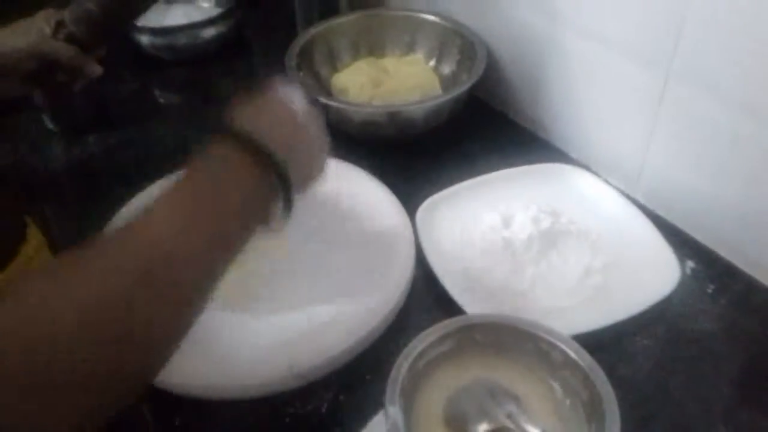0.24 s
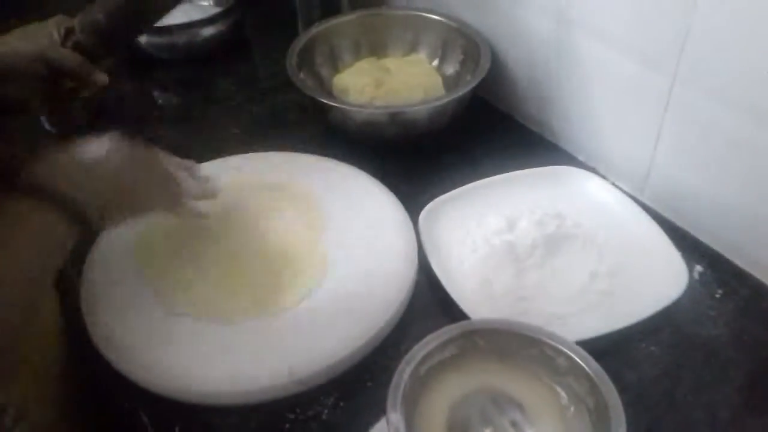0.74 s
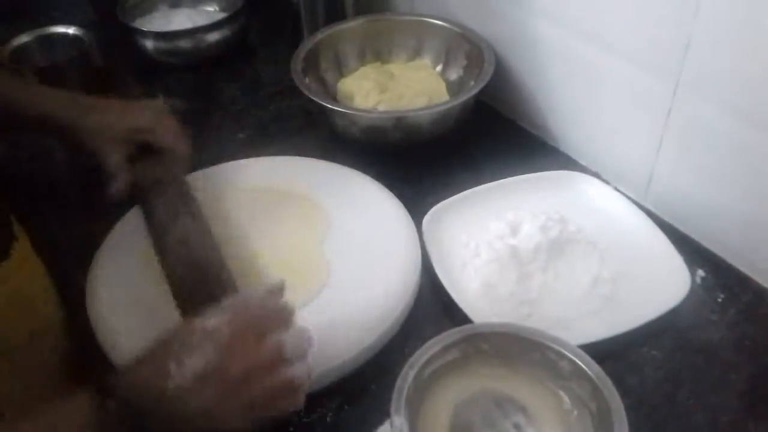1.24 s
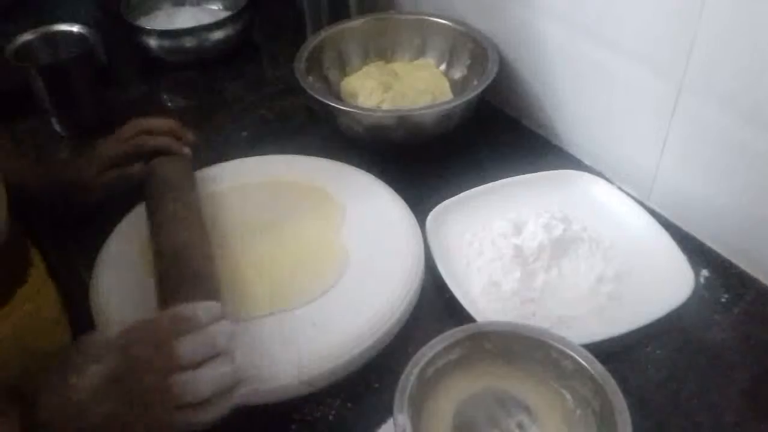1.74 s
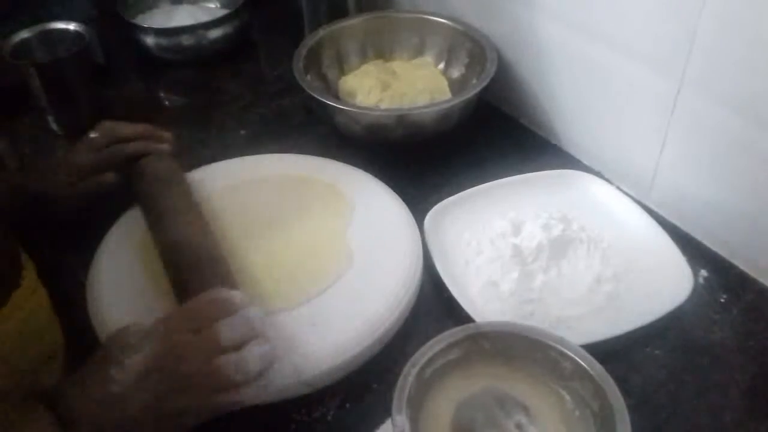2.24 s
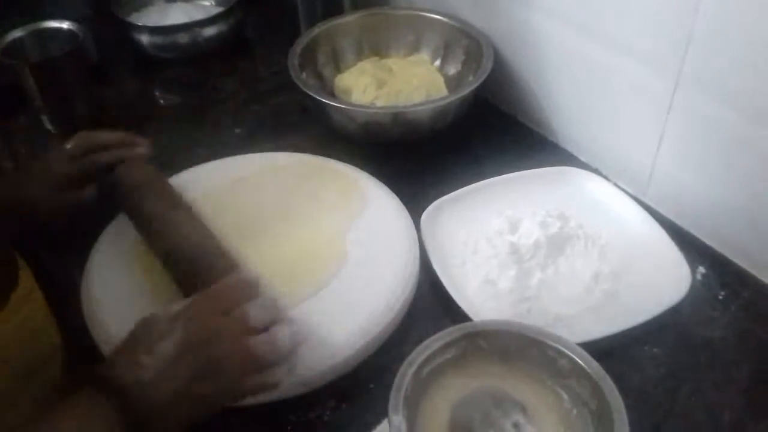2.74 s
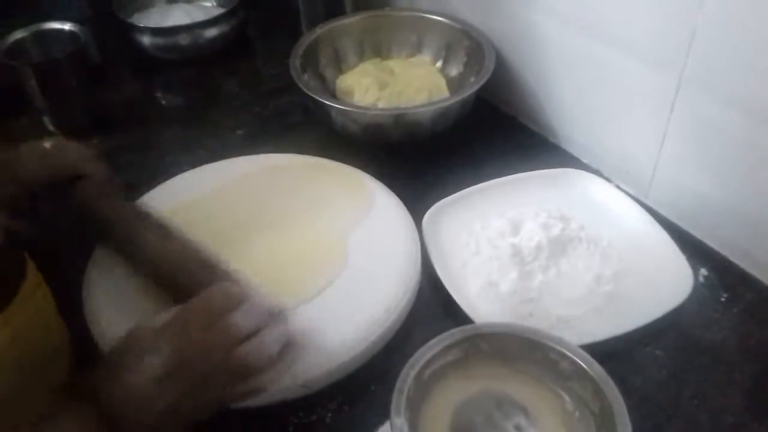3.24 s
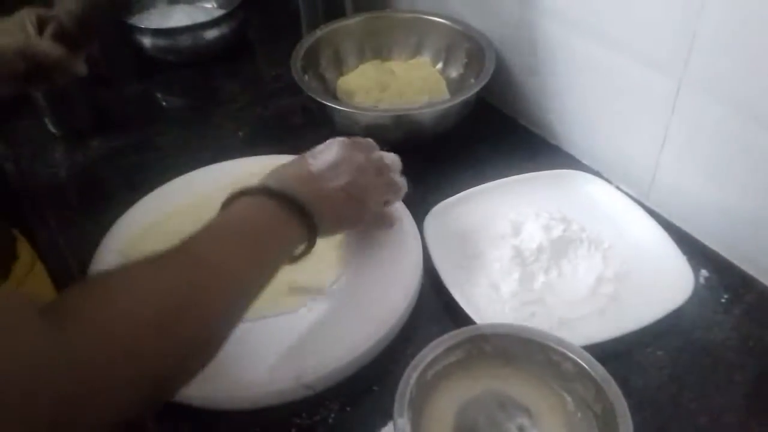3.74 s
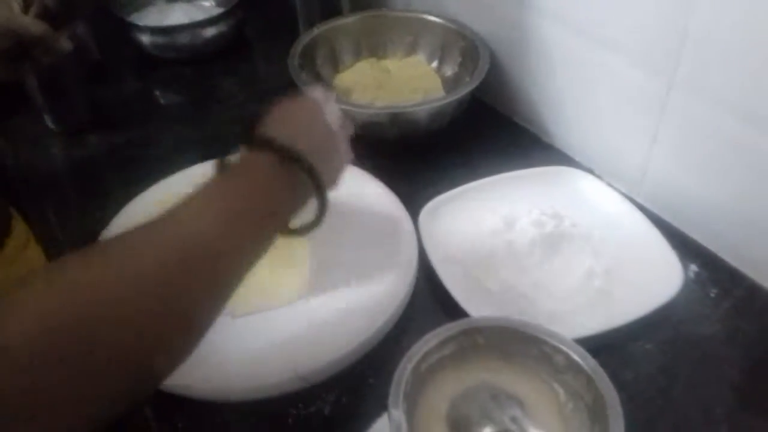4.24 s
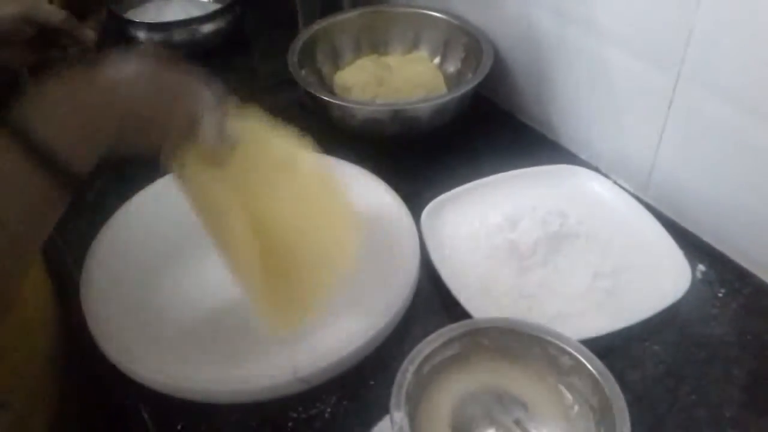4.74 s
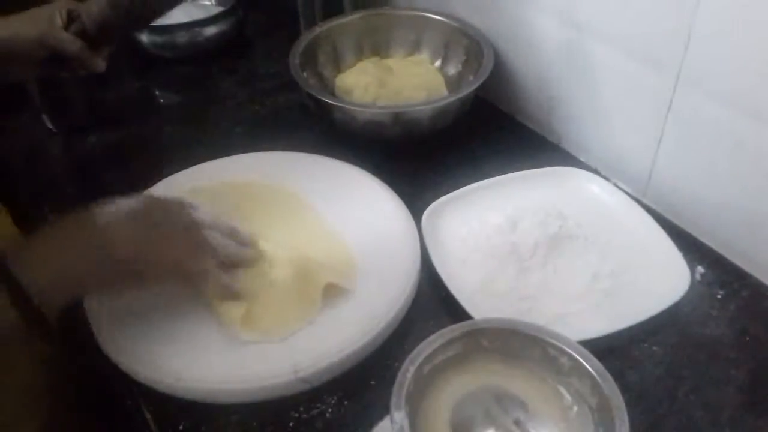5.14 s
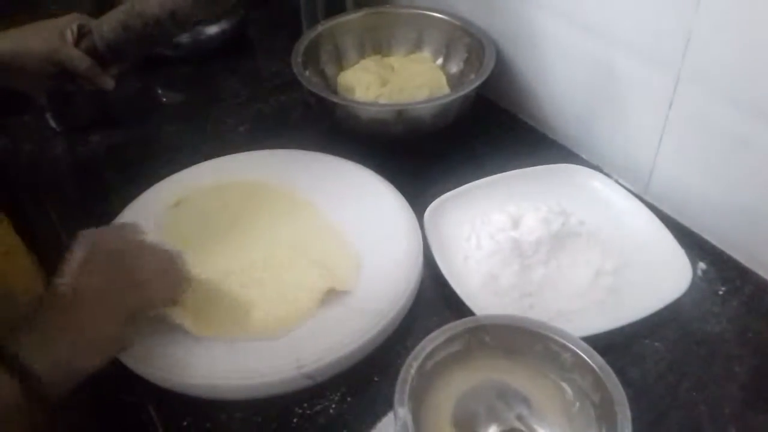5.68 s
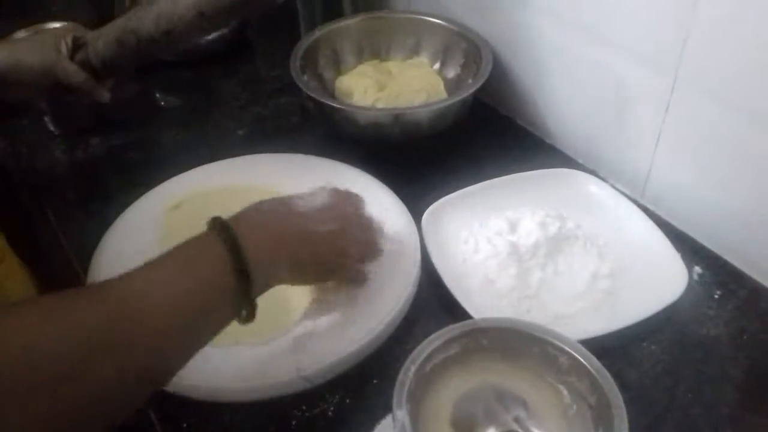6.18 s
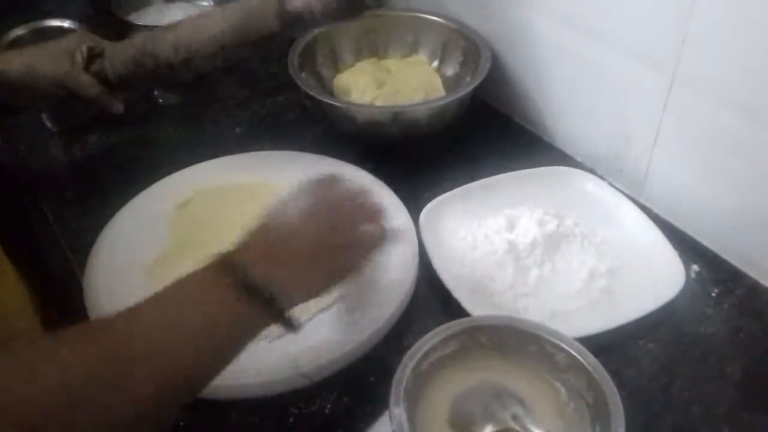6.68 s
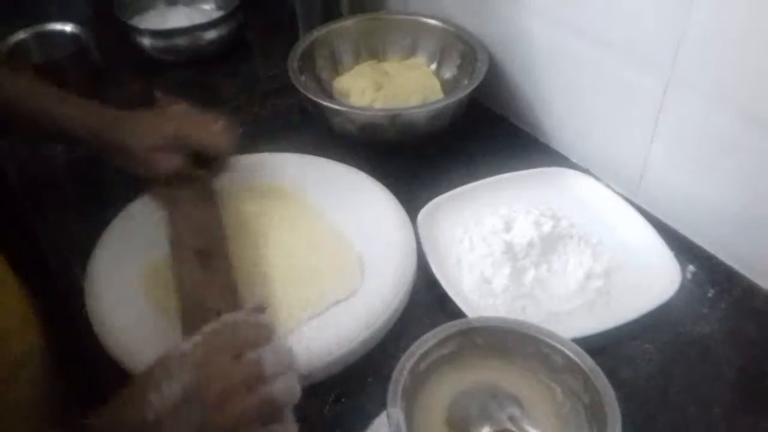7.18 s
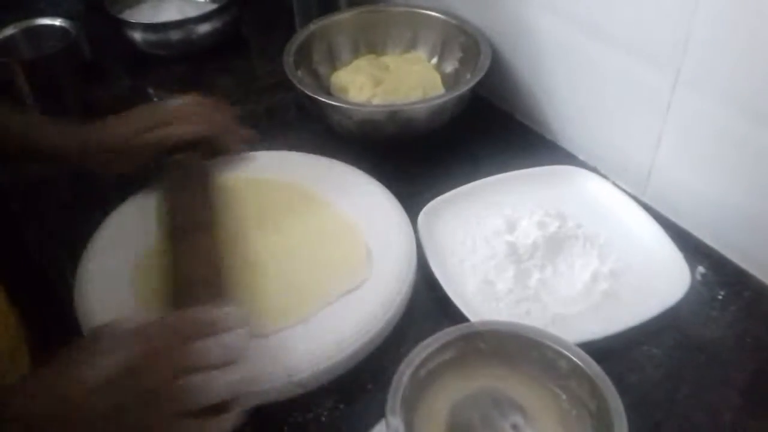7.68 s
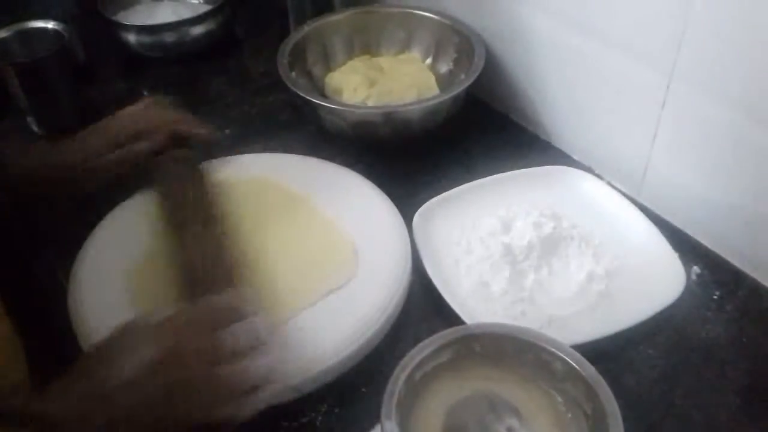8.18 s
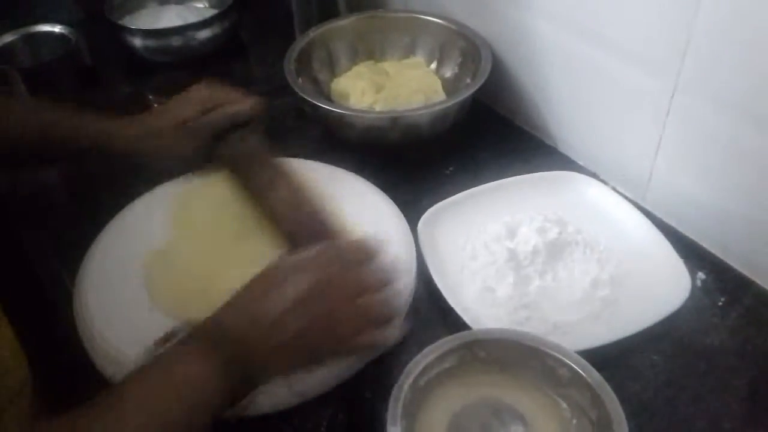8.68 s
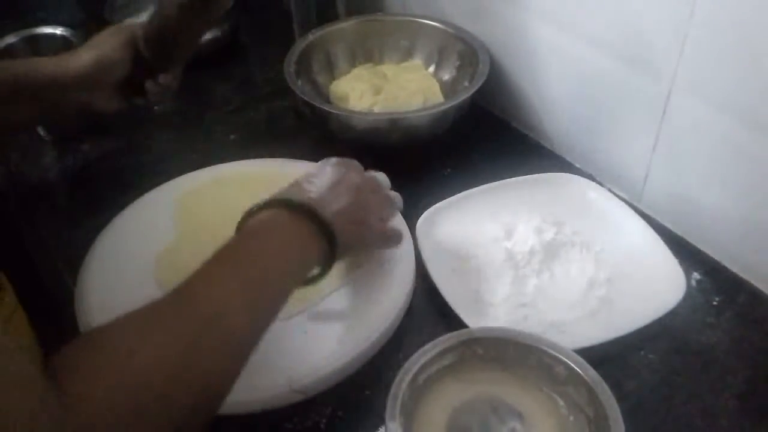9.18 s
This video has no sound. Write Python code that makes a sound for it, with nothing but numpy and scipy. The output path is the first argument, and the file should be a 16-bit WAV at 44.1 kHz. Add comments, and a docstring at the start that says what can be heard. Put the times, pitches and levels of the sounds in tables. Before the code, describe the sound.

Close in a tiled kitchen, rhythmic rolling-pin swishes over floured dough, soft slaps between, then one hard board knock and a ringing dish bump.

```python
"""In a small tiled kitchen, flatbread is rolled out on a round board on a stone counter, close to a phone.
Friction is noise made of clustered micro-slips: a hand sweeps dough through flour, a wooden pin swishes to and fro.
Impacts are decaying noise bursts: dough is slapped and dropped, the pin clicks on the rim.
Once the board rocks and knocks on the counter, once a dish is bumped; both ring on as sums of decaying modes.
Diffuse echoes of the room follow the sounds, over a quiet background and a steady hiss."""
import sys
import numpy as np
from scipy import signal
from scipy.fft import rfft, irfft
from scipy.io import wavfile
from scipy.ndimage import map_coordinates

SR = 44100
rng = np.random.default_rng(int(sys.argv[2]) if len(sys.argv) > 2 else 0)


def transcribe(u):
    """Save the signal u as a 16-bit wav file named by the first command-line argument.

    u: samples, shape (n,) or (channels, n), limited to [-1, 1]; the rate is SR.
    q: integer samples, one column per channel.
    """
    v = np.clip(np.atleast_2d(u).T, -1, 1)
    q = np.round(v * 32767).astype(np.int16)
    wavfile.write(sys.argv[1], SR, q)


N = 415422

# All levels are relative: each sound's own gains come on top.
# palm or pin comes down on the dough in two contacts:
# (t/s, thud level/dB, smack level/dB, second contact against the first level/dB)
PATS = [(0.999, -36.5, -41, 3.5), (1.438, -37.5, -62, -3.5), (6.939, -37, -40.5, -2)]
PAT_GAP_S = 0.013
# light touches on the board: (t/s, thud level/dB, smack level/dB)
TOUCHES = [(0.008, -46, -49.5), (2.129, -49, -53), (3.022, -49.5, -49), (3.603, -68, -58),
           (3.863, -51.5, -54), (4.137, -48, -51.5), (6.352, -44.5, -54), (6.49, -51, -59)]
SHUDDER_AT_S = 2.34
# spectra of the board's thud, the counter's thump and the smack of squeezed air: (f/Hz, level per Hz/dB)
THUD_SPECTRUM = [(150, -18.5), (280, 4.5), (400, -3), (540, 2.5), (800, -1.5), (1200, -19), (2500, -27.5),
                 (6000, -54)]
THUMP_SPECTRUM = [(40, -29), (80, -5), (130, -9), (280, 1.5), (450, -12), (1200, -54), (5000, -53)]
SMACK_SPECTRUM = [(200, -36), (700, -0.5), (1400, 10), (2300, 5), (3300, 3.5), (4300, 3), (5200, -10.5),
                  (6500, -24.5), (9000, -37), (15000, -46)]

# brisk wipes of hand and dough over the flour: (start t/s, length t/s, hiss level/dB, board rumble level/dB)
SCUFFS = [(0.024, 0.12, -48, -61), (0.097, 0.16, -54.5, -53), (0.781, 0.15, -50.5, -43),
          (1.06, 0.16, -57, -79), (3.584, 0.11, -52, -87), (3.882, 0.043, -56.5, -59),
          (3.933, 0.075, -56, -67), (4.035, 0.028, -60, -78), (4.167, 0.065, -56, -56),
          (4.373, 0.18, -72, -67), (4.889, 0.12, -62, -50), (6.214, 0.042, -58.5, -58),
          (6.507, 0.061, -71, -57), (6.717, 0.048, -59.5, -51), (8.393, 0.19, -59, -51),
          (8.806, 0.072, -52.5, -50), (8.988, 0.096, -60.5, -86), (9.313, 0.05, -62.5, -68.5)]
# the dough is dragged and turned gently: (start t/s, length t/s, hiss level/dB, board rumble level/dB)
DRAGS = [(0.14, 0.33, -65.5, -72), (0.59, 0.17, -64, -87), (1.17, 0.74, -63.5, -69),
         (3.625, 0.48, -66.5, -69), (4.15, 0.44, -75.5, -69), (4.607, 0.68, -70, -93),
         (5.275, 0.71, -79, -77), (6.238, 0.7, -72.5, -66.5), (7.438, 0.23, -59, -66),
         (8.602, 0.18, -49, -65), (9.142, 0.34, -66.5, -81.5)]
# spectra of friction on flour and of the rumbling board: (f/Hz, level per Hz/dB)
FLOUR_SPECTRUM = [(500, -14), (1200, -10), (2200, 0.5), (3200, 2), (4200, 3), (5000, -10), (6200, -22.5),
                  (8000, -31.5), (15000, -35)]
RUMBLE_SPECTRUM = [(60, -47.5), (150, -13.5), (250, 2.5), (350, 5), (500, 7), (780, 7.5), (1100, -2),
                   (1800, 3), (4000, -40.5)]

# the sheet of dough is dropped: (t/s, time it takes to lie down t/s, level/dB)
FLOPS = [(0.798, 0.033, -29), (4.946, 0.028, -29.5)]
# spectrum of folding dough: (f/Hz, level per Hz/dB)
FLUTTER_SPECTRUM = [(400, -7), (900, -12), (1500, 3), (2300, 0), (3200, -13), (6000, -58)]

# the pin clicks on the board's rim: (t/s, ring level/dB, tick level/dB, time it keeps bouncing t/s)
CLICKS = [(1.313, -63.5, -76, 0), (3.021, -51, -43.5, 0), (3.216, -40, -43, 0), (3.361, -38.5, -46, 0.036)]
# bending modes of the pin: (f/Hz, level/dB)
PIN_MODES = [(996, 2), (2115, 6.5), (3310, 6), (4050, -21)]
# spectrum of the tick: (f/Hz, level per Hz/dB)
TICK_SPECTRUM = [(800, -8), (1400, -0.5), (2600, -20), (3300, 7), (4300, 2), (5200, -9), (8000, -37)]
BOUNCE_S, BOUNCE_LOSS_DB, PIN_T60_S = 0.0065, 1.5, 0.033

# bouts of rolling, forth and back at an even pace: (start t/s, end t/s, first stroke's swish level/dB)
BOUTS = [(1.445, 3.646, -56), (7.072, 8.99, -60)]
STROKE_S = 0.246  # nominal: a bout is divided into the nearest whole number of equal strokes
# each stroke is firmer than the last, up to full effort; the last one eases off
FIRMER_DB, FULL_EFFORT_DB, EASE_OFF_DB = 3.5, -48, -5
# resonances of the rolling pin: (f/Hz, width f/Hz, level/dB)
PIN_RESONANCES = [(2050, 60, -7.5), (3290, 118, 0)]
# spectrum of crushed flour under the pin: (f/Hz, level per Hz/dB)
SWISH_SPECTRUM = [(600, -9), (1200, -9.5), (1700, -30), (2300, -1.5), (2750, -9.5), (3500, 2), (4300, -0.5),
                  (5000, -4), (6000, -16.5), (7500, -25.5), (15000, -34.5)]

# the board rocks on the counter: (t/s, level/dB, contact brightness f/Hz)
KNOCKS = [(7.2809, -15.5, 4850), (7.2858, -21, 3460), (7.2907, -26.5, 5000), (7.3059, -12.5, 610)]
# spectrum of the feet's hard contact: (f/Hz, level per Hz/dB)
CRACK_SPECTRUM = [(40, -30), (90, -19), (300, 5), (800, 6), (1300, 5.5), (1800, -0.5), (3000, -2),
                  (4400, -1.5), (5200, -15), (6500, -25.5), (9000, -38), (15000, -45)]
# modes of board and dish: (f/Hz, level/dB, t60/s)
BOARD_MODES = [(83.5, -29.5, 0.73), (180, -17.5, 0.67), (238, -18, 0.23), (323, -2, 0.18), (368, -2, 0.47),
               (414, -8.5, 0.54), (465, -19, 0.69), (575, -11, 0.3), (700, -14.5, 0.283), (808, 0, 0.15),
               (821, -15, 0.58), (1010, -21, 0.24), (1190, -20, 0.086), (1204, -6, 0.094),
               (1333, -5.5, 0.16), (2210, -11, 0.13), (3100, -21, 0.15), (3260, -7, 0.12)]
DISH_MODES = [(730, -15.5, 0.096), (1115, -16.5, 0.41), (1150, -5, 0.16), (1350, -15, 0.23),
              (1600.5, -3, 0.2), (1616, -13.5, 0.48), (1664, -17.5, 0.39), (1625, 7, 0.063),
              (2300, -19, 0.34), (2490, -24, 0.35), (2930, -28, .25), (3240, -13.5, 0.17)]
# the dish is bumped and chatters: (t/s, level/dB)
BUMPS = [(8.502, -16), (8.5073, -16), (8.518, -19)]
# spectrum of the dish's contact: (f/Hz, level per Hz/dB)
CLINK_SPECTRUM = [(100, -35), (350, -5), (700, 3), (1500, 8.5), (2600, 5.5), (4300, -2), (5200, -13.5),
                  (6500, -33.5), (9000, -28.5), (15000, -41.5)]

# low resonances of counter and room: (f/Hz, level/dB, t60/s)
NOOK_MODES = [(177, -33.5, 0.65), (307, -3, 0.61), (367.5, 3.5, 0.69), (440, -7, 0.44), (546, -40, 0.23)]
# kitchen reverberation: (f/Hz, t60/s, level/dB)
ROOM = [(100, 0.36, 1), (400, 0.6, -7), (1190, 0.53, -3.5), (3780, 0.54, -8), (10000, 0.28, 0.5)]
# spectra of the quiet background and of the steady hiss: (f/Hz, level per Hz/dB)
QUIET_SPECTRUM = [(15, -46), (25, -6), (48, -19.5), (86, -12), (188, -14), (227, -10.5), (368, -6.5),
                  (433, -11.5), (509, -15), (804, -14.5), (1750, -20), (2850, -25), (4150, -23.5),
                  (5880, -29.5), (15500, -32.5)]
HISS_SPECTRUM = [(15, -38.5), (25, -17), (152, -5), (209, -5), (433, -5.5), (567, -5.5), (1570, -7),
                 (4040, -10.5), (5010, -14), (15500, -20)]
QUIET_DB, HISS_DB = -67.5, -70.5
TOP_HZ = 15750


def undb(db):
    """Amplitude gain is an exponential function of level in decibels."""
    return 10 ** (np.asarray(db) / 20)


def unit(x):
    """Normalization: division by the root mean square makes the rms one."""
    return x / np.sqrt(np.mean(x ** 2))


def seconds(count):
    """Sampling: the time axis of count samples, in seconds."""
    return np.arange(count) / SR


def add(track, s, sound):
    """Superposition: a sound is added to the track at time s."""
    start = max(int(s * SR), 0)
    track[start:start + len(sound)] += sound[:N - start]


def through(x, response):
    """Convolution: a linear system is applied by its impulse response."""
    return signal.oaconvolve(x, response)[:len(x)]


def low_cut(x, hz, order=4):
    """Inefficient radiation: small things radiate no deep bass, here a steep high-pass."""
    return signal.sosfilt(signal.butter(order, hz, "high", fs=SR, output="sos"), x)


def colour(x, points, size=4096):
    """Minimum-phase filtering: a causal filter takes the given spectrum; white noise keeps its power."""
    hz, db = np.transpose(points)
    bins_hz = np.maximum(np.arange(size // 2 + 1) * SR / size, 1)
    level_db = np.interp(np.log(bins_hz), np.log(hz), db)
    # folding the cepstrum onto positive times makes the response causal
    cepstrum = irfft(np.log(undb(level_db)))
    cepstrum[1:size // 2] *= 2
    cepstrum[size // 2 + 1:] = 0
    response = irfft(np.exp(rfft(cepstrum)))
    return through(x, response / np.linalg.norm(response))


def ring(modes):
    """Modal superposition: one second of exponentially decaying sines after a unit blow."""
    t = seconds(SR)
    return sum(undb(db) * np.sin(2 * np.pi * hz * t) * np.exp(-np.log(1000) * t / t60)
               for hz, db, t60 in modes)


def burst(length, count=SR // 4):
    """Impact: a contact is a crowd of dense micro-impacts that dies away exponentially."""
    return rng.standard_normal(count) * np.exp(-seconds(count) / max(length, 1 / SR))


def grains(scatter_db, catch_db=0.5):
    """Friction: micro-slips change every millisecond, in clusters as the surfaces catch and let go."""
    slips = np.repeat(rng.standard_normal(N // 48 + 1), 48)[:N]
    catch_knots = rng.standard_normal(N // 400 + 1)  # about 9 ms apart
    catches = np.interp(np.arange(N) / 400, np.arange(len(catch_knots)), catch_knots)
    return unit(rng.standard_normal(N) * undb(scatter_db * slips + catch_db * catches))


def wander(rate):
    """Slow random process: linear glides between random values, rate of them a second."""
    knots = rng.standard_normal(1000)
    return np.interp(seconds(N) * rate, np.arange(len(knots)), knots)


def gestures(rows, shape, lean):
    """Speed envelope: each (start, length, dB) move rises and falls, peaking earlier when lean is under one."""
    gain = np.zeros(N)
    for s, length, db in rows:
        phase = np.linspace(0, 1, int(length * SR)) ** lean
        add(gain, s, undb(db) * np.abs(np.sin(np.pi * phase)) ** shape)
    return gain


def landing(thud_db, smack_db, weight_db, length, lowest_hz=290, cushion_s=0.0057, crackle_db=3):
    """Cushioned impact: pockets of squeezed air smack, the board thuds, weight thumps the counter."""
    cushion = np.minimum(seconds(SR // 4) / cushion_s, 1)  # dough takes a moment to press flat
    pocket_levels = np.repeat(rng.standard_normal(SR // 4), 64)[:SR // 4]
    pockets = unit(undb(crackle_db * pocket_levels))
    thud = low_cut(colour(cushion * burst(length), THUD_SPECTRUM), lowest_hz)
    thump = undb(weight_db) * colour(cushion * burst(length), THUMP_SPECTRUM)
    smack = colour(cushion * pockets * burst(length), SMACK_SPECTRUM)
    return undb(thud_db) * (thud + thump) + undb(smack_db) * smack


def slapping(pat_weight_db=-2, pat_s=0.0098, touch_weight_db=-14, touch_s=0.019,
             shudder_db=-55, shudder_s=0.038):
    """Repeated impact: heavy pats land twice, light touches once; a hard push shakes the board."""
    out = np.zeros(N)
    for s, thud_db, smack_db, second_db in PATS:
        add(out, s, landing(thud_db, smack_db, pat_weight_db, pat_s))
        # a harder contact is brighter, so the smack changes twice as much
        second = landing(thud_db + second_db, smack_db + 2 * second_db, pat_weight_db, pat_s)
        add(out, s + PAT_GAP_S, second)
    for s, thud_db, smack_db in TOUCHES:
        add(out, s, landing(thud_db, smack_db, touch_weight_db, touch_s))
    shudder = colour(burst(shudder_s, count=SR // 2), THUMP_SPECTRUM)
    add(out, SHUDDER_AT_S, undb(shudder_db) * shudder)
    return out


def sweeping(hiss_db=-0.5, rumble_db=-1, shape=1.24, lean=0.63, drag_shape=0.17,
             uneven_db=4.0, uneven_rate=16):
    """Sliding friction: dough and hand cross the floured board in brisk scuffs over a gentle, uneven drag."""
    scuffs, drags = np.array(SCUFFS), np.array(DRAGS)
    pressure = undb(uneven_db * wander(uneven_rate))

    def motion(level_column):
        """Superposed speed envelopes: scuffs and drags at the levels in one column."""
        columns = [0, 1, level_column]
        return gestures(scuffs[:, columns], shape, lean) + pressure * gestures(drags[:, columns], drag_shape, 1)

    hiss = motion(2) * colour(grains(scatter_db=1.5, catch_db=2.0), FLOUR_SPECTRUM)
    rumble = motion(3) * colour(grains(scatter_db=2.5, catch_db=3.5), RUMBLE_SPECTRUM)
    return undb(hiss_db) * hiss + undb(rumble_db) * rumble


def flopping(edge_db=-16, edge_smack_db=-9.5, belly_smack_db=-7, hem_db=-2, hem_smack_db=-15, weight_db=-22,
             edge_share=1.2, belly_share=0.43, hem_share=0.42, hem_s=0.011,
             flap_db=-2, flap_s=0.0015, lowest_hz=390):
    """Progressive contact: edge smacks, belly thuds and flaps, hem follows; a slower fall spreads them out."""
    out = np.zeros(N)
    for s, fall_s, db in FLOPS:
        flat_s = fall_s * (1 + hem_share)
        still_falling = np.clip((flat_s - seconds(SR // 4)) / hem_s, 0, 1)
        edge = landing(edge_db, edge_smack_db, weight_db, edge_share * fall_s, lowest_hz)
        belly = landing(0, belly_smack_db, weight_db, belly_share * fall_s, lowest_hz)
        flap = undb(flap_db) * colour(burst(flap_s), FLUTTER_SPECTRUM)
        hem = landing(hem_db, hem_smack_db, weight_db, hem_s, lowest_hz)
        add(out, s, undb(db) * still_falling * edge)
        add(out, s + fall_s, undb(db) * (belly + flap))
        add(out, s + flat_s, undb(db) * hem)
    return out


def clicking(contact_s=0.0009, tick_s=0.015, uneven=0.25):
    """Damped flexural modes: the pin's bare end ticks on the rim, may bounce, and rings until palms damp it."""
    out = np.zeros(N)
    contact = np.minimum(seconds(SR) / contact_s, 1)  # wood gives a little as it strikes
    tone = low_cut(contact * ring([(hz, db, PIN_T60_S) for hz, db in PIN_MODES]), 870)
    for s, ring_db, tick_db, bouncing_s in CLICKS:
        for k in range(1 + int(bouncing_s / BOUNCE_S)):
            tick = low_cut(colour(burst(tick_s, count=SR), TICK_SPECTRUM), 580)
            click = undb(ring_db) * tone + undb(tick_db) * tick
            # the first contact is on time, the bounces are uneven
            late_s = BOUNCE_S * (k + uneven * rng.uniform(-0.974, 1) * (k > 0))
            add(out, s + late_s, undb(-BOUNCE_LOSS_DB * k) * click)
    return out


def strokes():
    """Periodic motion: evenly paced (start, length, dB) strokes, firmer up to full effort, the last eased off."""
    rows = []
    for start, end, first_db in BOUTS:
        count = int(round((end - start) / STROKE_S))
        db = np.minimum(first_db + FIRMER_DB * np.arange(count), FULL_EFFORT_DB)
        db[-1] += EASE_OFF_DB
        length = (end - start) / count
        rows += [(start + k * length, length, db[k]) for k in range(count)]
    return rows


def rolling(swish_db=-6.5, body_db=-8.5, rumble_db=-64, rumble_share=0.71, overlap_s=0.0094,
            shape=1.07, lean=0.95, waver=0.009, waver_rate=14):
    """Friction-driven resonance: the pin rubs the palms and crushes flour; its modes sing, the board rumbles."""
    # a resonance's decay time is inverse to its width
    modes = [(hz, db, np.log(1000) / np.pi / width) for hz, width, db in PIN_RESONANCES]
    body = unit(through(grains(scatter_db=-1.0), ring(modes)))
    # the modes waver as the grip shifts
    body = map_coordinates(body, [np.cumsum(1 + waver * wander(waver_rate))], mode="mirror")
    flour = colour(grains(scatter_db=1.5), SWISH_SPECTRUM)
    swish = undb(swish_db) * flour + undb(body_db) * low_cut(body, 900)
    # the two hands turn a moment apart, so strokes overlap
    moves = [(s - overlap_s / 2, length + 2 * overlap_s, db) for s, length, db in strokes()]
    # the rumble follows the speed, and the effort only in part
    rumble_moves = [(s, length, rumble_db + rumble_share * (db - FULL_EFFORT_DB)) for s, length, db in moves]
    rumble = colour(grains(scatter_db=2.5), RUMBLE_SPECTRUM) * gestures(rumble_moves, shape=0.64, lean=lean)
    return swish * gestures(moves, shape, lean) + rumble


def knocking(crack_db=-1, crack_s=0.008):
    """Contact stiffness: the board's feet hit the counter; softer contacts are duller, by a low-pass."""
    out = np.zeros(N)
    for s, db, bright_hz in KNOCKS:
        blow = undb(db + crack_db) * colour(burst(crack_s), CRACK_SPECTRUM)
        add(out, s, signal.sosfilt(signal.butter(2, bright_hz, fs=SR, output="sos"), blow))
    return out


def ringing(board_db=-25.0, dish_db=-15, swell_s=0.0061):
    """Free vibration: board and dish ring on in their modes after their blows."""
    out = np.zeros(N)
    # the board's modes start out of step, as its feet land one after another
    for mode in BOARD_MODES:
        add(out, KNOCKS[0][0] + rng.uniform(0, .006), undb(board_db) * ring([mode]))
    # the dish's ring builds up while it chatters
    swell = np.minimum(seconds(SR) / swell_s, 1)
    add(out, 8.5055, undb(dish_db) * low_cut(ring(DISH_MODES) * swell, 399))
    return out


def clinking(crack_db=-5, crack_s=0.0099, settle_db=-25):
    """Chattering contact: quick hard impacts on the dish, which then settles on the counter."""
    out = np.zeros(N)
    for s, db in BUMPS:
        add(out, s, undb(db + crack_db) * colour(burst(crack_s), CLINK_SPECTRUM))
    add(out, 8.532, undb(settle_db) * colour(burst(0.011), RUMBLE_SPECTRUM))
    return low_cut(out, 284)


def kitchen(x, gap_s=0.008):
    """Diffuse reverberation: echoes of tiled walls are decaying noise, each octave with its own decay."""
    t, tail = seconds(SR), 0
    hz, t60, db = np.transpose(ROOM)
    edges = np.append(0, SR / 2 ** np.arange(9, 0, -1))  # octave bands
    noise, bins_hz = rfft(rng.standard_normal(SR)), np.arange(SR // 2 + 1)
    for lo, hi in zip(edges, edges[1:]):
        log_middle = np.log((lo + hi) / 2)
        rate = np.log(1000) / np.interp(log_middle, np.log(hz), t60)
        gain = undb(np.interp(log_middle, np.log(hz), db))
        band = irfft(noise * (bins_hz >= lo) * (bins_hz < hi))
        # the square root keeps the energy independent of the decay time
        tail = tail + band * np.exp(-rate * t) * gain * np.sqrt(2 * rate / SR)
    return through(x, tail * np.minimum(t / gap_s, 1))  # the tail builds up over gap_s


def scene(nook_db=-62, pin_room_db=-3, ring_room_db=-6, trailing_db=-27, low_cut_hz=78):
    """Superposition: sounds reach both channels alike; a faint diffuse noise trailing them, and a hiss, differ."""
    pin, rings = rolling(), ringing()
    handling = slapping() + sweeping() + flopping() + clicking()
    nook = undb(nook_db) * through(pin + handling, ring(NOOK_MODES))
    blows = handling + nook + knocking() + clinking()
    to_walls = blows + undb(pin_room_db) * pin + undb(ring_room_db) * rings
    heard = low_cut(pin + blows + rings + kitchen(to_walls), low_cut_hz, order=6)
    quiet = undb(QUIET_DB) * colour(rng.standard_normal(N), QUIET_SPECTRUM)
    hiss = undb(HISS_DB) * colour(rng.standard_normal(N), HISS_SPECTRUM)
    # a diffuse noise trails the sounds, shaped by the same kind of decaying tail
    trailing_noise = undb(trailing_db) * kitchen(heard)
    unshared = hiss + trailing_noise
    return heard + quiet + unshared * np.array([[1], [-1]])  # opposite sign in the two channels


def record(dry):
    """Band limitation: the phone cuts the top with a steep elliptic low-pass."""
    return signal.sosfilt(signal.ellip(10, .2, 70, TOP_HZ, fs=SR, output="sos"), dry)


dry = scene()
out = record(dry)
transcribe(out)
```